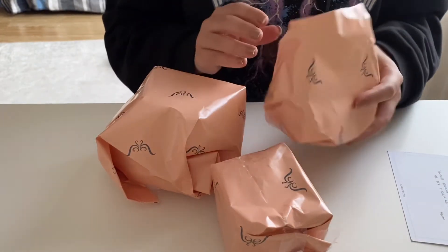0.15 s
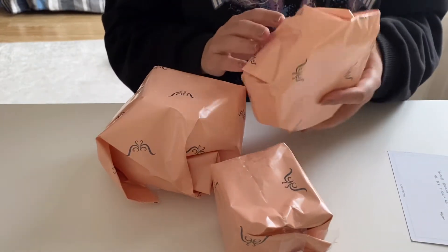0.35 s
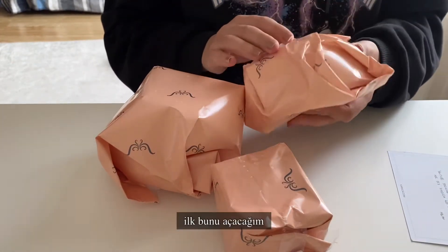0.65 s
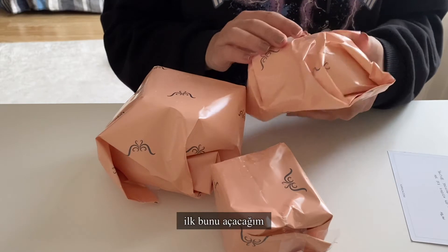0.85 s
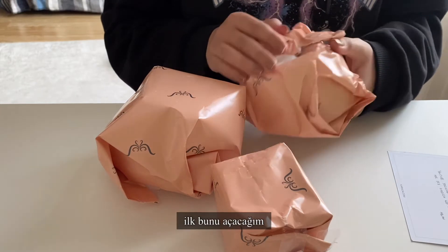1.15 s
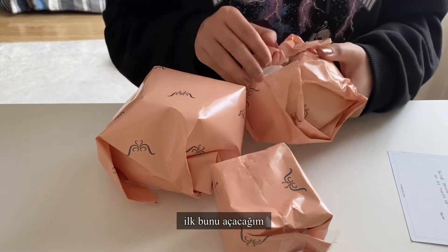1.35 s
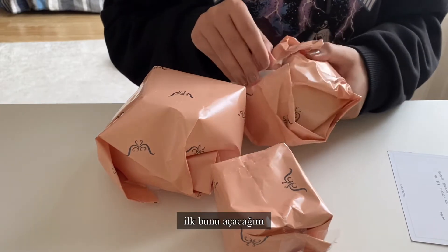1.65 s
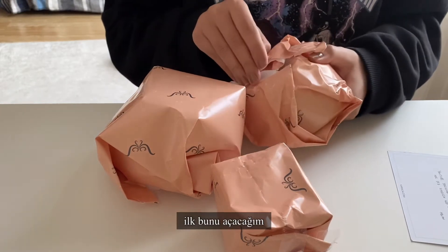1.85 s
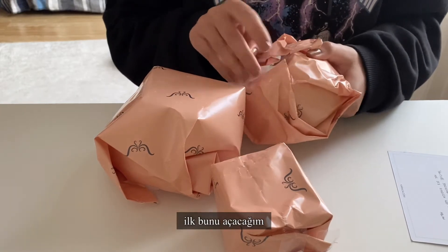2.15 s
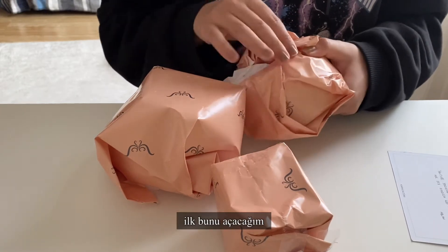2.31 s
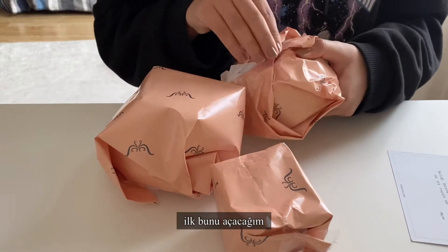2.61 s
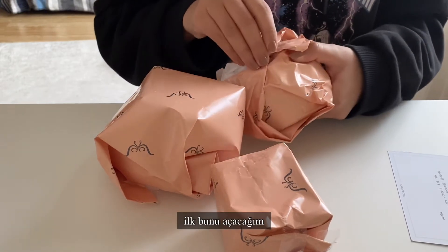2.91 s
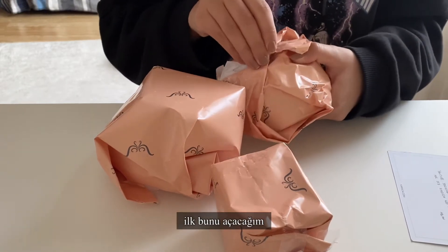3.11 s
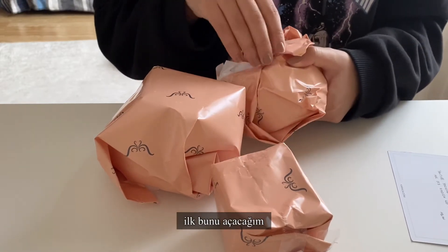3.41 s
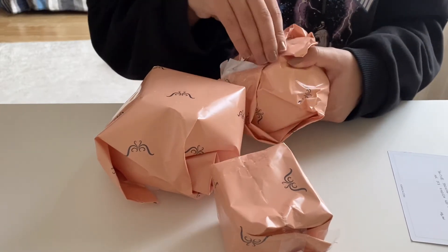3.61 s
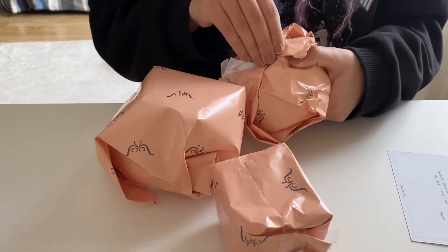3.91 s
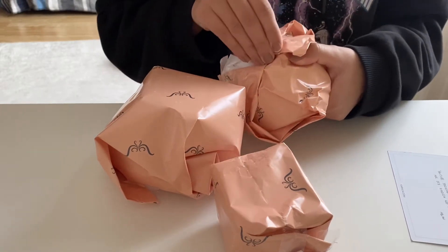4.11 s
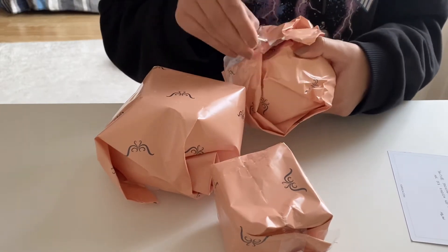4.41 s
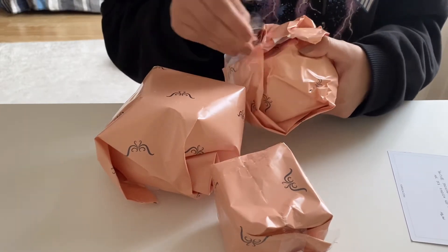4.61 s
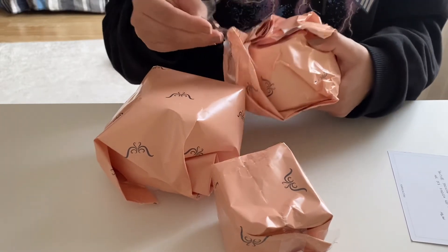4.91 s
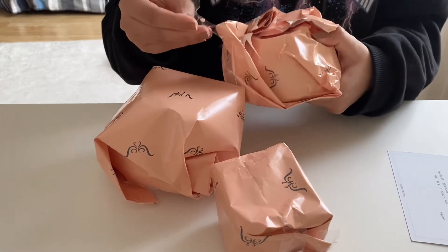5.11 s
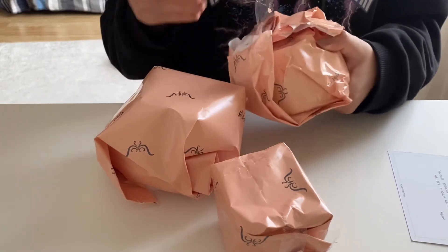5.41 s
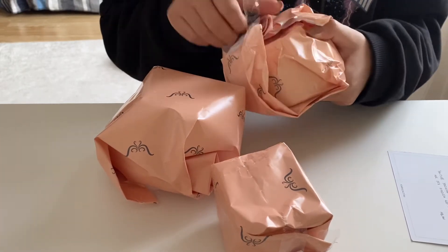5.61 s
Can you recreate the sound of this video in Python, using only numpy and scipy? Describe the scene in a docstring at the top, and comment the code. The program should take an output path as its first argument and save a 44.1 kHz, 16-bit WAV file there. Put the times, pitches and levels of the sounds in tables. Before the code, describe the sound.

Hands crinkle and pick at glossy wrapping paper on a parcel, with sharp snaps, soft table bumps and peeling tape.

```python
"""Hands crinkle and pick at the glossy paper round a parcel on a table, near a phone, in a quiet room.
From the start, paper rustles over a low hum. Creases snap and ring their panels, bumps boom in the
table top, fingers knock the hollow parcel. At 2.9 s sticky tape creaks by stick-slip; the sharpest snaps
come at 3.8 and 4.3 s; at 5.1 s a peeling strip rasps, and the crinkling goes on.
Throughout, the phone's two microphone ports hear the treble at different moments."""
import sys
import numpy as np
from scipy import signal
from scipy.fft import rfft, irfft, next_fast_len
from scipy.io import wavfile
from scipy.ndimage import map_coordinates

SR = 44100
rng = np.random.default_rng(int(sys.argv[2]) if len(sys.argv) > 2 else 0)


def int16_out(signal):
    """Quantize to a 16-bit WAV file."""
    q = np.round(np.clip(np.atleast_2d(signal).T, -1, 1) * 32767)
    wavfile.write(sys.argv[1], SR, q.astype(np.int16))


N = 253575

# room air spectrum: f/Hz, level/dB
AIR_SPECTRUM = [(28, -31.5), (62, -6), (130, -21), (210, -21.5), (400, -34), (870, -28.5), (1640, -46),
                (16000, -92.5)]
# diffuse field: f/Hz, left-right coherence
COHERENCE = [(60, 0.99), (300, 0.66), (640, 0.078), (2000, 0.27), (7000, 0.24), (15000, 0.29)]
# hands at work: t/s, sliding/dB, tiny creases/dB, parcel shuffle/dB
HAND_LEVELS = [(0, -65.5, -79, -62), (.08, -93, -92, -76), (.15, -79, -78, -69), (.23, -72, -78, -70),
               (.37, -62.5, -59.5, -62), (.67, -57, -58, -69), (.73, -67, -69, -70),
               (.9, -59.5, -63.5, -62), (1.08, -65, -59, -75.5), (1.47, -58, -59.5, -52.5),
               (1.65, -63, -63, -68), (1.9, -55, -62, -60), (2.03, -67.5, -73.5, -66),
               (2.12, -55, -57.5, -68), (2.32, -58.5, -57.5, -62), (2.42, -67.5, -65.5, -70),
               (2.61, -69, -75, -77), (2.82, -64, -61, -64.5), (3.12, -60.5, -66, -71.5),
               (3.29, -62, -61, -65), (3.48, -72.5, -71.5, -72), (3.73, -60.5, -66, -65.5),
               (3.91, -52, -61.5, -57.5), (4.2, -69.5, -52, -75), (4.52, -70, -74.5, -88),
               (4.66, -57.5, -61.5, -68.5), (4.75, -65.5, -70, -64), (4.85, -55, -55, -61),
               (5.07, -57.5, -58, -79), (5.25, -60, -63, -58.5), (5.38, -79, -82, -76),
               (5.55, -105, -91.5, -87), (5.59, -53.5, -60.5, -65.5), (5.75, -64, -64, -65)]
# bright crack of the creases, with the recorder's treble cutoff near 16 kHz: f/Hz, level/dB
CRACK_SPECTRUM = [(1500, -20), (4000, -10.5), (7000, -3), (11000, -2), (15800, -6.5), (16300, -29.5)]
# sliding and ringing paper spectrum: f/Hz, level/dB
PAPER_SPECTRUM = [(500, -15), (1200, -2), (2000, 0.5), (3300, -0.5), (5000, -5), (8000, -43.5),
                  (12000, -40)]
# air inside the wrapping: f/Hz, width/Hz, level/dB
CAVITY_MODES = [(317, 126, -4.5), (414, 83, -1.5), (634, 103, 1.5)]
# buckling creases: t/s, crack peak/dB, ring peak/dB, panel f/Hz
CREASE_SNAPS = [(0.096, -70, -48.5, 1860), (0.116, -59, -49, 2720), (0.13, -64, -47, 1760),
                (0.1542, -62, -46.5, 1770), (0.2457, -48, -41.5, 1720), (0.3399, -48, -42.5, 1200),
                (0.4207, -63, -37.5, 2030), (0.5337, -26.5, -34.5, 1880), (0.7931, -46, -43.5, 2210),
                (0.892, -65, -32, 1780), (0.9922, -38, -42.5, 1060), (1.092, -37.5, -40, 2450),
                (1.1462, -35, -36.5, 1710), (1.1728, -26.5, -34.5, 2540), (1.398, -34.5, -34.5, 1750),
                (1.479, -32.5, -34, 1110), (1.5204, -34.5, -58, 1540), (1.6286, -52, -41.5, 2370),
                (1.7047, -38, -38.5, 1470), (1.7203, -21, -31, 2750), (1.8066, -18.5, -15.5, 1970),
                (1.8178, -50, -25.5, 2610), (1.8412, -27.5, -33, 2510), (2.181, -34, -46, 2970),
                (2.1957, -41, -37.5, 3680), (2.2088, -28, -36.5, 1780), (2.2375, -38.5, -47, 1160),
                (2.3379, -29.5, -48, 3500), (2.5272, -33.5, -46, 3900), (2.5507, -34.5, -40, 4030),
                (2.6357, -59, -49, 2530), (2.6712, -32.5, -43, 4140), (2.6948, -54.5, -50, 1540),
                (2.781, -21, -32.5, 1880), (2.7936, -32, -36.5, 1760), (2.8684, -33.5, -39, 1670),
                (3.1658, -35.5, -65, 1840), (3.193, -27, -62, 4500), (3.2014, -41, -51, 1770),
                (3.2426, -31, -54, 1760), (3.251, -31, -40.5, 1660), (3.3097, -40.5, -54, 1560),
                (3.4968, -29, -43, 1740), (3.5436, -24.5, -42, 4100), (3.633, -28, -42.5, 4490),
                (3.641, -40, -51, 3870), (3.6693, -34, -57, 1160), (3.7224, -38, -54.5, 2130),
                (3.7556, -22, -37.5, 4500), (3.7805, -7, -19, 3970), (3.7915, -49, -25, 3900),
                (3.8, -46.5, -42.5, 3370), (3.8842, -38.5, -40.5, 1760), (3.9503, -34.5, -35.5, 2590),
                (3.9617, -45, -33.5, 2020), (4.0076, -25.5, -40.5, 2000), (4.0287, -27, -57, 1790),
                (4.139, -34.5, -39, 1850), (4.2519, -24.5, -32, 4170), (4.279, -2, -25, 2600),
                (4.288, -26, -38, 4200), (4.2983, -9.5, -21.5, 1937), (4.3026, -10, -33.5, 4480),
                (4.3092, -14.5, -23.5, 1750), (4.3842, -48, -37.5, 1150), (4.4346, -28.5, -46, 2060),
                (4.5674, -41.5, -56, 1220), (4.881, -40, -29, 3260), (4.9343, -23.5, -22, 1680),
                (4.9414, -22, -28, 1600), (4.9505, -29, -28.5, 3330), (4.9687, -34, -28.5, 1550),
                (4.9804, -19, -20.5, 930), (5.0044, -20, -15, 2884), (5.023, -28.5, -40, 2010),
                (5.0399, -27, -40, 3490), (5.226, -37.5, -42, 990), (5.236, -29.5, -39, 1640),
                (5.2465, -36, -39.5, 1610), (5.5626, -40.5, -40.5, 1790), (5.581, -37, -40, 1040),
                (5.5934, -47, -30.5, 1470), (5.6331, -35.5, -39, 1870), (4.2594, -30, -37, 2200)]
# parcel against table: t/s, level/dB
TABLE_BUMPS = [(0.174, -47), (1.002, -48.5), (1.177, -55), (1.401, -40), (1.725, -44.5), (2.106, -43),
               (3.276, -42.5), (3.781, -46.5), (4.295, -39.5), (4.745, -50), (4.996, -50), (5.236, -41.5)]
# table top: f/Hz, level/dB, t60/s
TABLE_MODES = [(76.4, -6, 0.34), (131.1, -6.5, 0.62), (201, -14, 0.4), (302, -9, 0.31)]
# knocks on the parcel: t/s, peak/dB
PARCEL_KNOCKS = [(0.176, -38.5), (0.268, -32.5), (0.534, -28.5), (0.794, -46.5), (0.993, -44), (1.103, -42),
                 (1.171, -33.5), (1.267, -43.5), (1.34, -47), (1.399, -36.5), (1.408, -43), (1.441, -39.5),
                 (1.63, -43.5), (1.721, -38), (1.806, -41), (2.092, -41), (2.105, -34), (2.135, -45),
                 (2.179, -40), (2.208, -35.5), (2.438, -33), (3.27, -40), (3.779, -35.5), (3.978, -44.5),
                 (4.278, -37), (4.305, -28.5), (4.386, -44.5), (4.673, -40), (4.881, -44), (4.941, -36),
                 (4.982, -32.5), (5.006, -34.5), (5.224, -38.5), (5.568, -44), (5.598, -38.5)]
# quick crumples: centre t/s, length/s, sliding/dB, creases/dB
CRUMPLES = [(.535, .03, -46.5, -49.5), (3.262, 0.033, -54.5, -48), (4.301, 0.046, -37, -30.5),
            (4.94, 0.022, -36.5, -42), (4.972, 0.039, -38, -46), (5.239, 0.034, -46, -46.5),
            (5.573, 0.028, -50, -53.5)]
# tape creak: t/s, slip rate/Hz, level/dB
TAPE_SLIPS = [(2.86, 114, -67.5), (2.93, 106, -61.5), (3.03, 83, -60), (3.08, 75, -56), (3.09, 21, -83)]
# tape resonances: f/Hz, width/Hz, level/dB
TAPE_MODES = [(644, 220, -3.5), (1530, 120, -6), (2510, 290, -2)]
# strip drawn off the paper: t/s, level/dB
STRIP_LEVELS = [(5.04, -75), (5.09, -58.5), (5.13, -51.5), (5.19, -57.5), (5.22, -86)]
# strip resonances: f/Hz, width/Hz, level/dB
STRIP_MODES = [(3270, 560, 15.5), (4630, 280, -1.5)]
# room reverb strength: f/Hz, level/dB
REVERB_SEND = [(200, -9.5), (700, -9), (2500, -9), (10000, -19.5)]
# room decay: f/Hz, t60/s
REVERB_DECAY = [(200, 0.42), (1000, 0.23), (3000, 0.26), (10000, 0.11)]

HUM_HZ, HUM_DB, AIR_DB = 49.5, -52.5, -59
SNAP_DELAY_S = .0008  # short delay of every snap after its listed time
PORT_SPLIT_HZ, PORT_LAG_S, TOP_HZ = 6700, .000239, 16800


def amp(db):
    """dB to gain."""
    return 10 ** (np.asarray(db) / 20)


def unit(x):
    """Scale to rms 1."""
    return x / np.sqrt(np.mean(x ** 2) + 1e-20)


def peaked(db, rows):
    """Scale each row to its peak level."""
    return amp(db) * rows / np.abs(rows).max(axis=1, keepdims=True)


def along(points, hz):
    """Interpolate (f/Hz, value) points on a log axis."""
    f, values = np.transpose(points)
    return np.interp(np.log(hz + 1), np.log(f + 1), values)


def curves(rows):
    """Per-sample curve for each column after t/s."""
    at_s, *columns = np.transpose(rows)
    return [np.interp(np.arange(N) / SR, at_s, column) for column in columns]


def wobble(rate_hz):
    """Smooth random curve, knots at rate_hz."""
    knots = rng.standard_normal(int(N * rate_hz / SR) + 4)
    return map_coordinates(knots, [np.arange(N) * rate_hz / SR])


def decay(t, attack_s, t60_s):
    """Quick rise, exponential fall."""
    return (t > 0) * (1 - np.exp(-t / attack_s)) * amp(-60 * t / t60_s)


def filtered(x, response):
    """Apply a complex frequency response."""
    size = next_fast_len(x.shape[-1] + 8192)
    return irfft(rfft(x, size) * response(np.fft.rfftfreq(size, 1 / SR)), size)[..., :x.shape[-1]]


def coloured(x, spectrum):
    """Shape by (f/Hz, level/dB) points."""
    return filtered(x, lambda hz: amp(along(spectrum, hz)))


def resonant(x, modes):
    """Parallel band-passes of alternating sign."""
    return filtered(x, lambda f: sum(
        (-1) ** k * amp(db) * 1j * f * width / (centre ** 2 - f ** 2 + 1j * f * width)
        for k, (centre, width, db) in enumerate(modes)))


def placed(at_s, rows):
    """Add each row at its time."""
    index = np.round(at_s * SR).astype(int)[:, None] + np.arange(rows.shape[1])
    return np.bincount(index.ravel(), rows.ravel(), N + SR)[:N]


def diffuse(pair):
    """Mix two unrelated signals to diffuse-field stereo."""
    angle = lambda hz: np.arccos(np.clip(along(COHERENCE, hz), -1, 1)) / 2
    mid, side = filtered(pair, lambda hz: np.array([np.cos(angle(hz)), np.sin(angle(hz))]))
    return np.array([mid + side, mid - side])


def room_tone():
    """Hum near mains pitch, wavering in pitch and level, over faint room air."""
    hum = np.sqrt(2) * np.sin(2 * np.pi * np.cumsum(HUM_HZ + 2.5 * wobble(5.3)) / SR)
    air = unit(diffuse(coloured(rng.standard_normal((2, N)), AIR_SPECTRUM)))
    return amp(HUM_DB + 2.1 * wobble(4.7)) * hum + amp(AIR_DB + 3 * wobble(7.9)) * air


def grains(rate_hz, centre_hz, spread_oct, t60_cycles, spread_db, clump, hiss):
    """Tiny creases give in clumps, each at its own pitch, over the fluttering hiss of sliding paper."""
    at_s = np.flatnonzero(rng.random(N) < rate_hz / SR * np.exp(clump * wobble(30))) / SR
    pitch = rng.standard_normal((len(at_s), 1))
    size = np.minimum(rng.exponential(size=(len(at_s), 1)), 3)
    hz = np.clip(centre_hz * 2 ** (spread_oct * pitch), 100, .4 * SR)
    cycles = hz * np.arange(256) / SR
    ticks = placed(at_s, amp(spread_db * size - 60 * cycles / t60_cycles) * np.sin(2 * np.pi * cycles))
    return unit(ticks) + hiss * amp(4.37 * wobble(25)) * rng.standard_normal(N)


def handling():
    """Fingers press, slide and shift the wrapping; it rustles on after each snap and knock."""
    slide_power, crease_power, shuffle_power = amp(curves(HAND_LEVELS)) ** 2
    flurry_slide, flurry_crease = flurries()
    snap_s, crack_db, ring_db, _ = np.transpose(CREASE_SNAPS)
    knock_s, knock_db = np.transpose(PARCEL_KNOCKS)
    crease_power += flurry_crease + settling(snap_s, crack_db - 26, t60_s=.23)
    slide_power += flurry_slide + settling(snap_s, ring_db - 20.5, t60_s=.1)
    shuffle_power += settling(knock_s, knock_db - 14, t60_s=.1)
    crackle = grains(700, 7100, spread_oct=.83, t60_cycles=1.6, spread_db=3.5, clump=1, hiss=1)
    rub = grains(350, 2420, spread_oct=.81, t60_cycles=6.6, spread_db=2.5, clump=.87, hiss=1.93)
    shuffle = grains(250, 600, spread_oct=.55, t60_cycles=2.9, spread_db=-1.5, clump=.5, hiss=1.55)
    return (np.sqrt(crease_power) * unit(coloured(crackle, CRACK_SPECTRUM))
            + np.sqrt(slide_power) * unit(coloured(rub, PAPER_SPECTRUM))
            + np.sqrt(shuffle_power) * unit(resonant(shuffle, CAVITY_MODES)))


def snaps():
    """A crease flips: a short crack, and the panel beside it rings."""
    at_s, crack_db, ring_db, panel_hz = np.transpose(CREASE_SNAPS)[:, :, None]
    t = np.arange(SR // 24) / SR - .002
    noise = rng.standard_normal((len(at_s), 2, len(t)))
    crack = coloured(noise[:, 0] * decay(t, .0004, .007), CRACK_SPECTRUM)
    tone = np.sin(2 * np.pi * panel_hz * t) * decay(t, .0003, .009)
    ring = coloured(tone + .84 * noise[:, 1] * decay(t, .0004, .018), PAPER_SPECTRUM)
    return placed(at_s[:, 0] + SNAP_DELAY_S + t[0], peaked(crack_db, crack) + peaked(ring_db, ring))


def settling(at_s, level_db, t60_s):
    """Power envelope of paper settling after each event."""
    t = np.arange(SR // 2) / SR
    return placed(at_s, (amp(level_db[:, None]) * decay(t, .001, t60_s)) ** 2)


def table_boom():
    """Soft bumps ring the table top."""
    at_s, bump_db = np.transpose(TABLE_BUMPS)[:, :, None]
    t = np.arange(SR // 2) / SR
    ring = sum(amp(db - 60 * t / t60_s) * np.sin(2 * np.pi * hz * t) for hz, db, t60_s in TABLE_MODES)
    return placed(at_s[:, 0], amp(bump_db) * ring * (1 - np.exp(-t / .005)))


def knocks():
    """Fingers and folds give the air inside the wrapping a soft, uneven push."""
    at_s, peak_db = np.transpose(PARCEL_KNOCKS)[:, :, None]
    t = np.arange(SR // 24) / SR
    push = (1 + .9 * rng.standard_normal((len(at_s), len(t)))) * decay(t, .00085, .008)
    return placed(at_s[:, 0], peaked(peak_db, resonant(push, CAVITY_MODES)))


def flurries():
    """Quick crumples swell and fade: power envelopes of sliding and creases."""
    centre_s, length_s, *levels_db = np.transpose(CRUMPLES)[:, :, None]
    swell = np.exp(-(4 * (np.arange(N) / SR - centre_s) / length_s) ** 2)
    return [(amp(db) ** 2 * swell).sum(axis=0) for db in levels_db]


def tape_creak():
    """Glue sticks and slips at a falling rate; each slip rings the tape."""
    rate_hz, level_db = curves(TAPE_SLIPS)
    slip_count = np.floor(np.cumsum(rate_hz * (1 + .076 * wobble(60))) / SR)
    slips = np.diff(slip_count, prepend=0) * amp(1.5 * wobble(41))
    gate = (np.arange(N) > TAPE_SLIPS[0][0] * SR) & (np.arange(N) < TAPE_SLIPS[-1][0] * SR)
    return gate * amp(level_db) * unit(resonant(slips, TAPE_MODES))


def strip_rasp():
    """A peeling strip rasps in a narrow band."""
    gate = (np.arange(N) > STRIP_LEVELS[0][0] * SR) & (np.arange(N) < STRIP_LEVELS[-1][0] * SR)
    rasp = grains(1000, 3000, spread_oct=.26, t60_cycles=3, spread_db=-.5, clump=.28, hiss=.79)
    return gate * amp(curves(STRIP_LEVELS)[0]) * unit(resonant(rasp, STRIP_MODES))


def reverb(x, predelay_s=.006):
    """Diffuse wall reflections; each frequency decays at its own rate."""
    hz, t, noise = signal.stft(rng.standard_normal((2, SR // 2)), SR, nperseg=256)
    tail = signal.istft(noise * amp(-60 * t / along(REVERB_DECAY, hz)[:, None]), SR, nperseg=256)[1]
    delayed = np.pad(x, (round(predelay_s * SR), 0))[None]
    return diffuse(signal.fftconvolve(delayed, tail / np.linalg.norm(tail[0]), axes=1)[:, :N])


def scene():
    """Parcel close by, room around it."""
    parcel = snaps() + knocks() + handling() + tape_creak() + strip_rasp()
    return parcel + table_boom() + reverb(coloured(parcel, REVERB_SEND)) + room_tone()


def record(dry):
    """Two band-limited ports: the left, slightly louder, leads a little below the split, lags above."""
    def ports(hz):
        lead_rad = .45 * np.clip(hz / 2500, 0, 1)
        lag_rad = 2 * np.pi * PORT_LAG_S * np.maximum(hz - PORT_SPLIT_HZ, 0)
        return np.exp(.5j * (lead_rad - lag_rad) * [[1], [-1]]) * (hz < TOP_HZ)
    return filtered(dry * amp([[.3], [-.3]]), ports)


dry = scene()
out = record(dry)
int16_out(out)
```